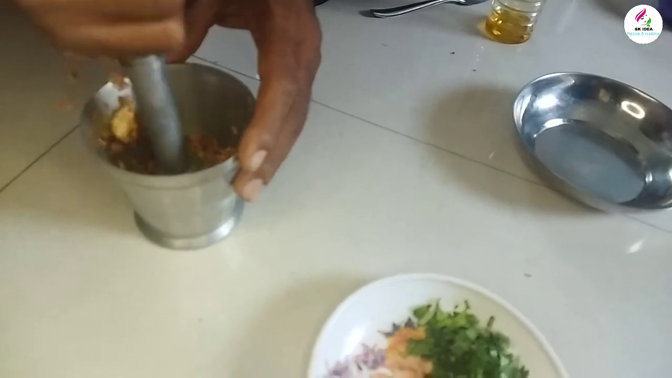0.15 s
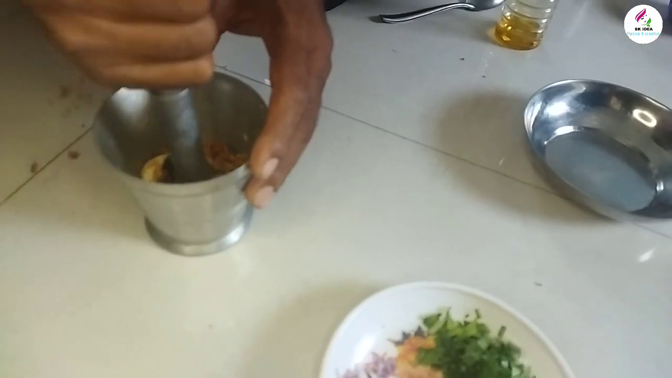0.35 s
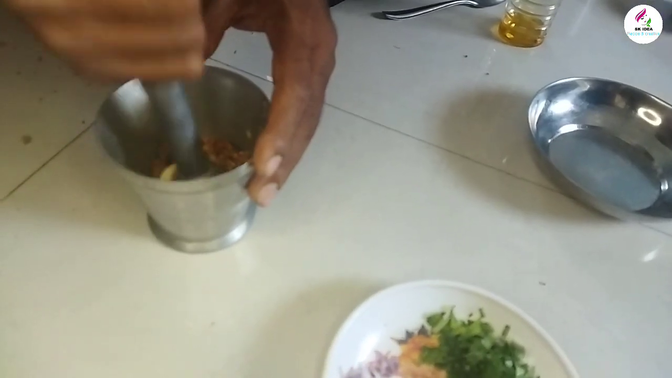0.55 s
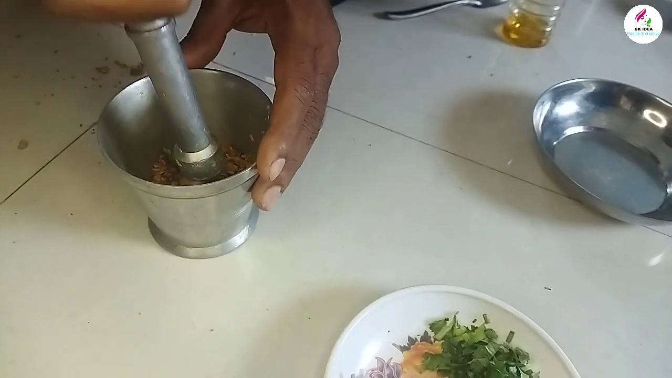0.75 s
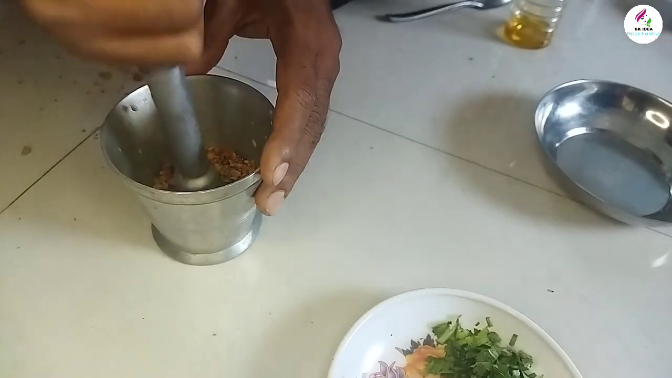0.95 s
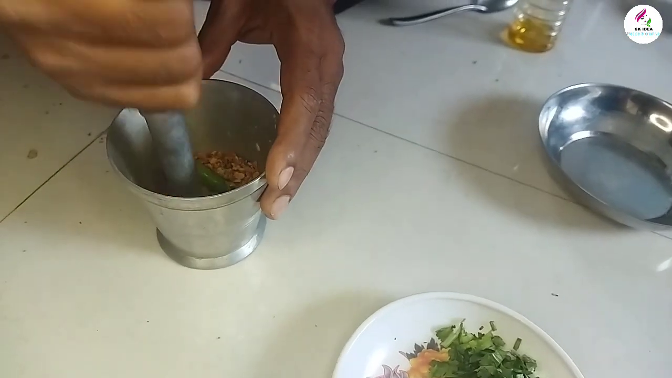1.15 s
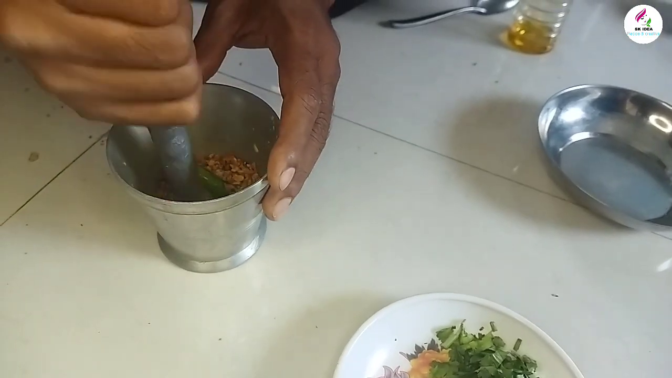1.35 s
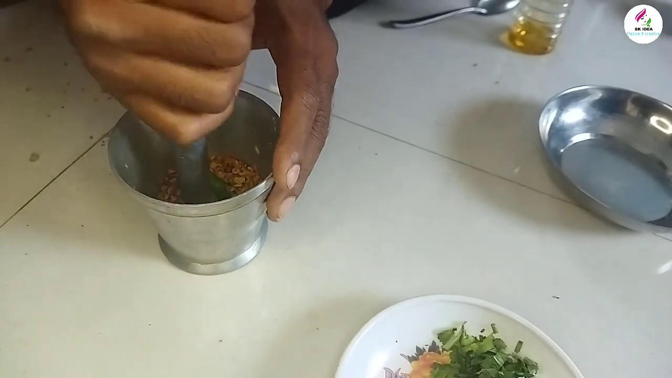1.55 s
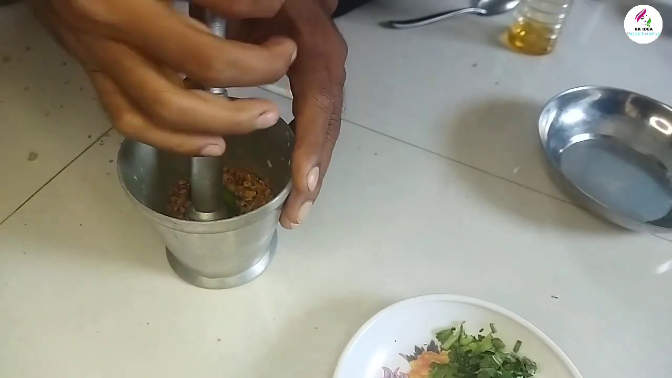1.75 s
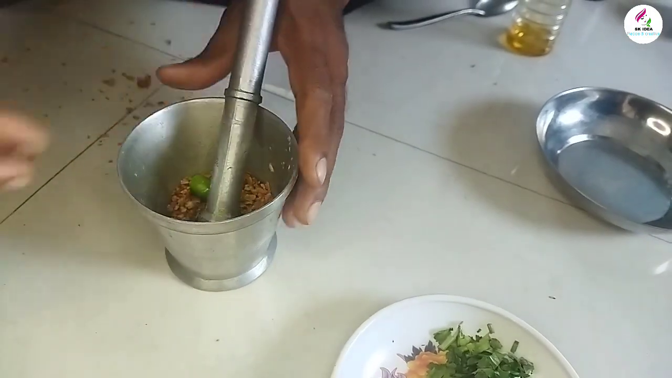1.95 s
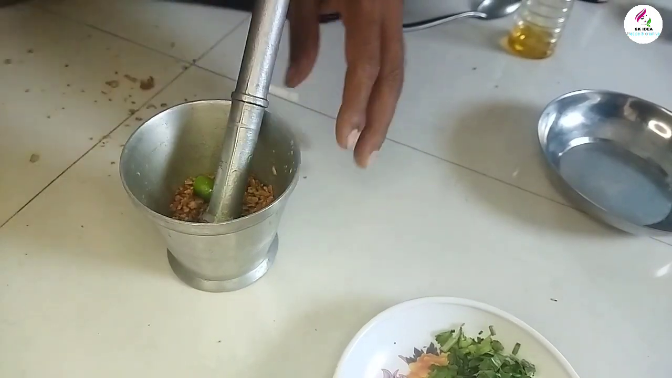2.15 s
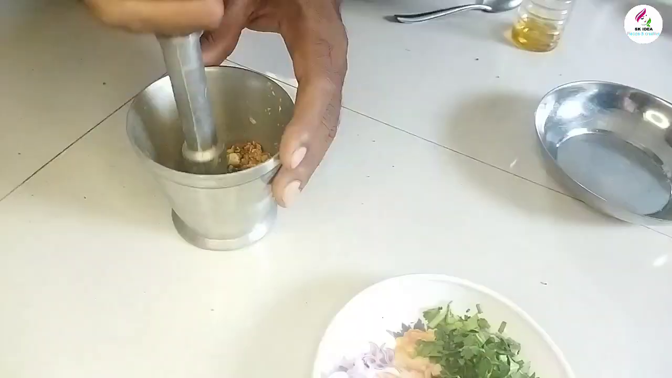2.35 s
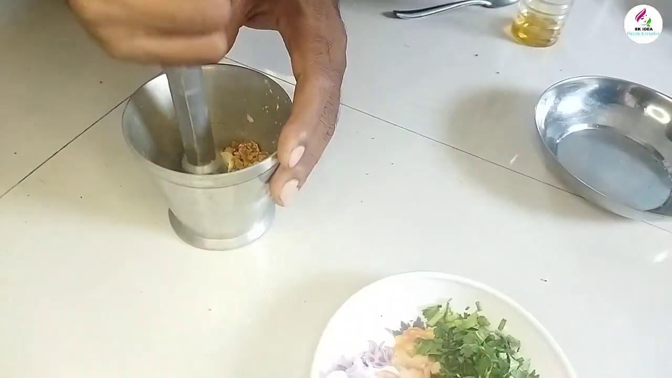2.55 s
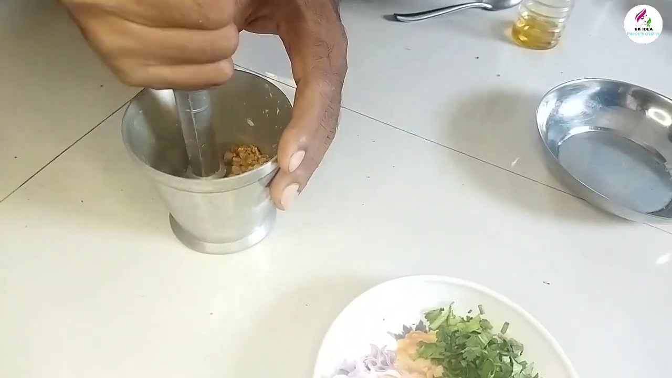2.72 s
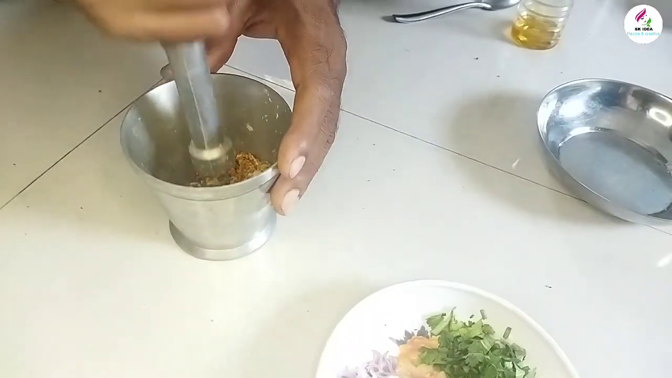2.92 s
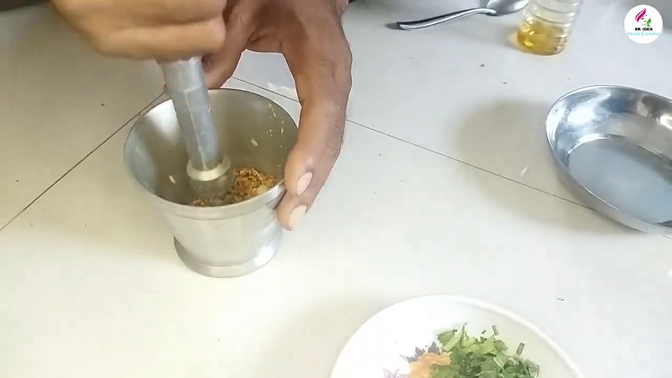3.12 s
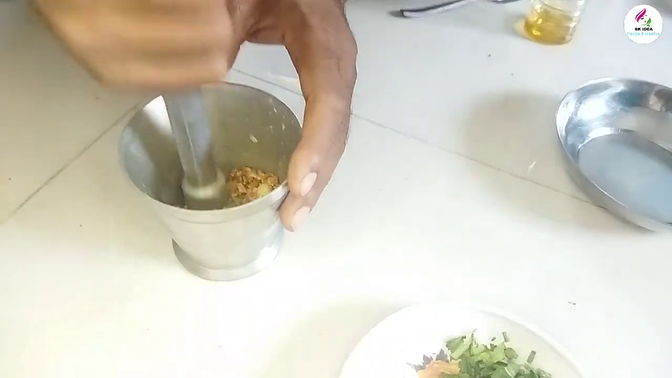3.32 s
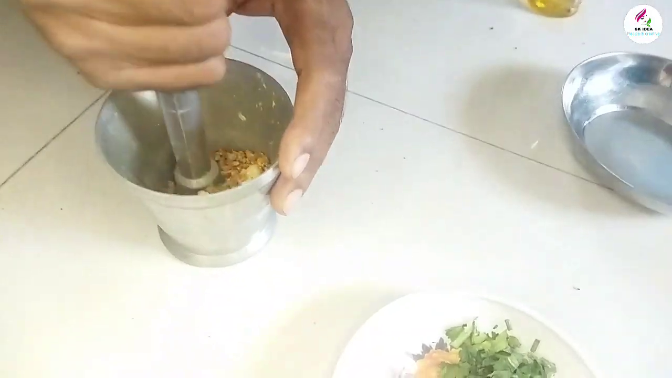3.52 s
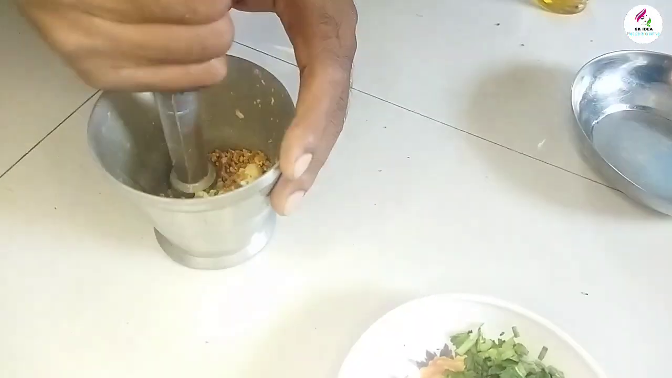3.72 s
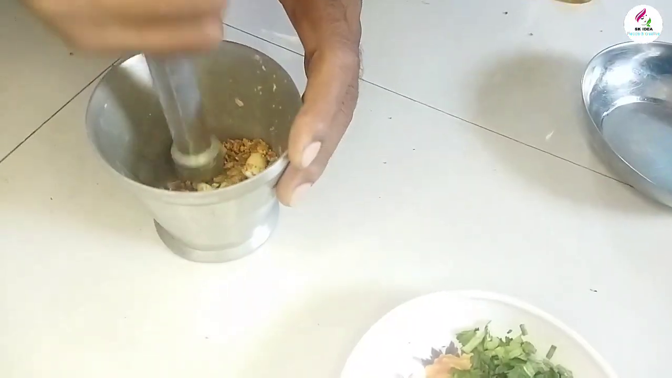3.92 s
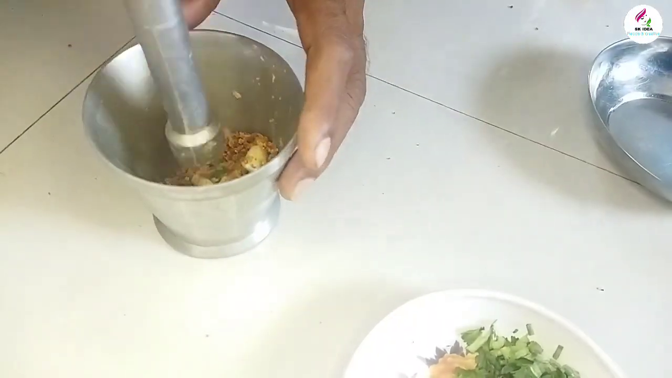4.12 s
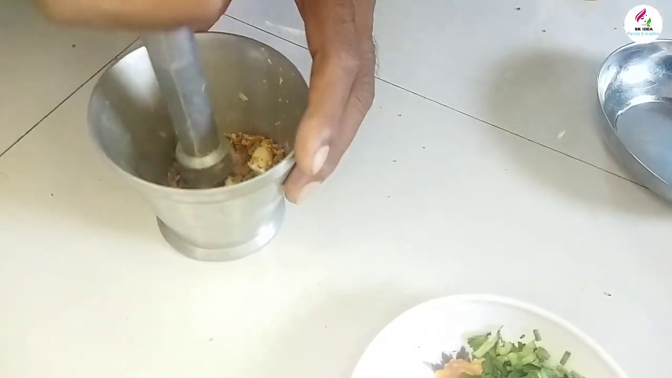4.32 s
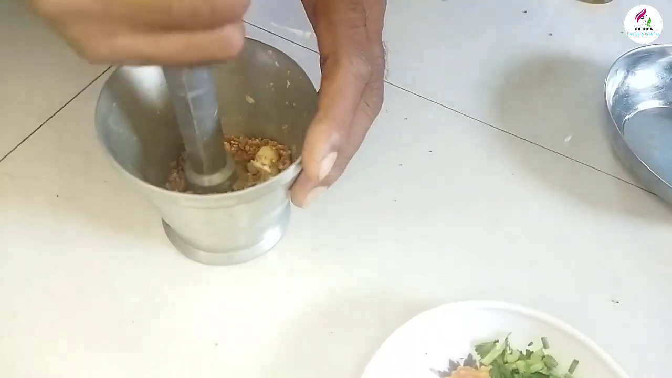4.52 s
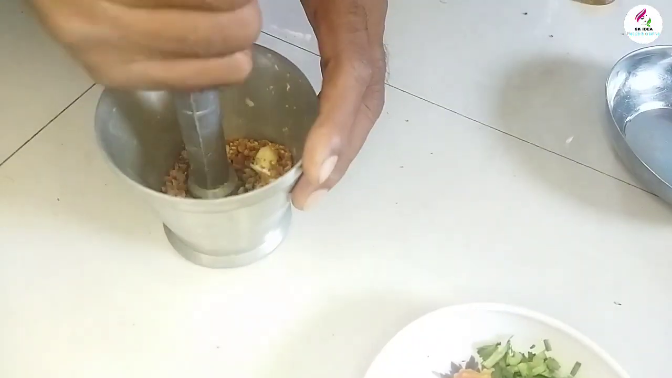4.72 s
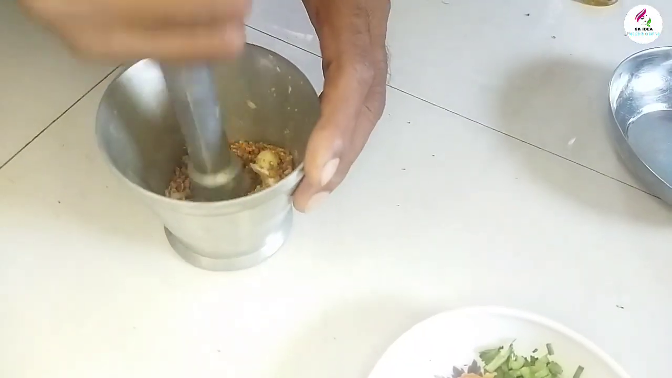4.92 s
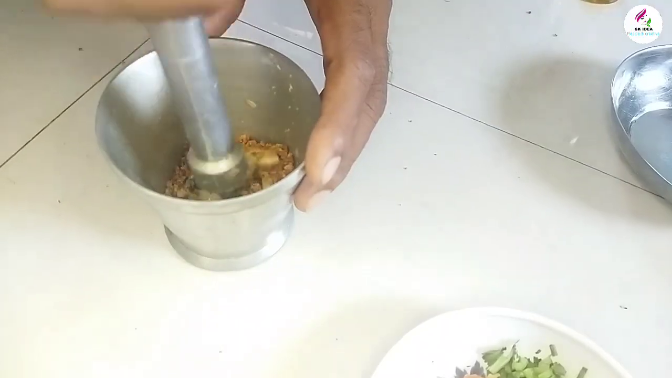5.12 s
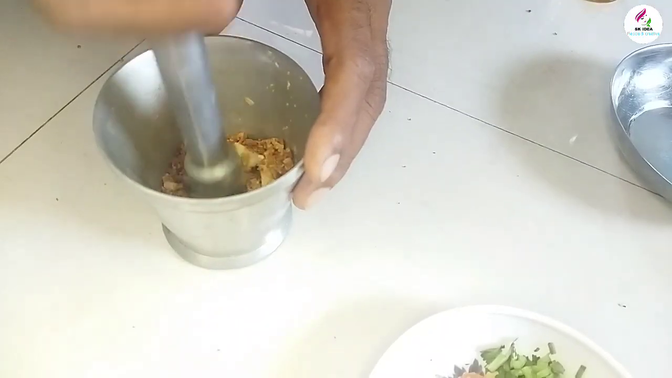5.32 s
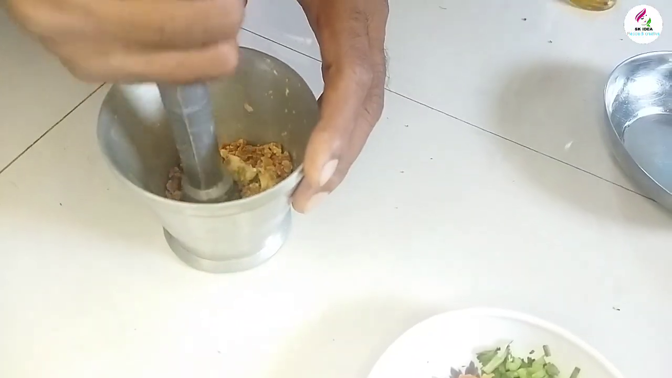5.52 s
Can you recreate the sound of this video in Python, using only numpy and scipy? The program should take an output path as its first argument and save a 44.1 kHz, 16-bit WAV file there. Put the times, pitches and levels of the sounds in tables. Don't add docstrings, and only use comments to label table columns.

```python
import sys
import numpy as np
from scipy import signal
from scipy.fft import rfft, irfft, next_fast_len
from scipy.io import wavfile
from scipy.ndimage import uniform_filter1d, map_coordinates

SR = 44100
rng = np.random.default_rng(int(sys.argv[2]) if len(sys.argv) > 2 else 0)


def invert_db(x):
    u = np.asarray(x, float) / 20
    return 10 ** u


def wrap_up_sound(samples):
    columns = np.atleast_2d(samples).T
    tamed = np.clip(columns, -1, 1)
    steps = np.round(tamed * 32767).astype(np.int16)
    wavfile.write(sys.argv[1], SR, steps)


N = 245637


def unit(x):
    return x / np.sqrt(np.mean(x ** 2) + 1e-20)


def along(points, hz):
    f, v = np.transpose(points)
    return np.interp(np.log(hz + 1), np.log(f + 1), v)


def curves(rows):
    s, *cols = np.transpose(rows)
    return [np.interp(np.arange(N) / SR, s, c) for c in cols]


def wobble(rate):
    knots = rng.standard_normal(int(N * rate / SR) + 4)
    return map_coordinates(knots, [np.arange(N) * rate / SR])


def filtered(x, response):
    m = next_fast_len(x.shape[-1] + 8192)
    spectrum = rfft(x, m) * response(np.fft.rfftfreq(m, 1 / SR))
    return irfft(spectrum, m)[..., :x.shape[-1]]


def coloured(x, spectrum):
    return filtered(x, lambda hz: invert_db(along(spectrum, hz)))


def causal(spectrum, size=4096):
    level = invert_db(along(spectrum, np.fft.rfftfreq(size, 1 / SR)))
    cepstrum = irfft(np.log(level + 1e-6), size)
    fold = np.r_[1, np.full(size // 2 - 1, 2), 1, np.zeros(size // 2 - 1)]
    pulse = irfft(np.exp(rfft(cepstrum * fold)), size)
    return pulse / np.abs(pulse).max()


def add(track, s, sound):
    part = track[..., round(s * SR):][..., :sound.shape[-1]]
    part += sound[..., :part.shape[-1]]


def sides(db):
    return invert_db([[db / 2], [-db / 2]])


# hz, likeness [-1..1]
SIDE_LIKENESS = [(60, 0.68), (240, 0.56), (950, 0.24), (3770, -0.38), (15000, -0.33)]


def rush(spectrum):
    def mid_side_gains(hz):
        mix = np.arccos(np.clip(along(SIDE_LIKENESS, hz), -1, 1)) / 2
        return invert_db(along(spectrum, hz)) * [np.cos(mix), np.sin(mix)]

    mid, side = filtered(rng.standard_normal((2, N)), mid_side_gains)
    return unit(np.array([mid + side, mid - side]))


# start_s, level_db
ENGINE_LEVEL = [(0.0, -56.5), (0.2, -62), (0.57, -58), (0.8, -57), (1.14, -61), (1.39, -56), (2.01, -54),
                (2.23, -62), (2.4, -79)]
# start_s, firing_hz
IDLE_SPEED = [(0, 38.22), (1.4, 37.24), (2.1, 37.22), (2.4, 36.5)]
# multiple of the firing rate, level_db
FIRING_ORDERS = [(1, -67), (2, -19.5), (3, -21), (4, -37), (5, -9.5), (6, -2.5), (7, -16.5), (8, -20),
                 (9, -22.5)]
# hz, level_db (per Hz)
STREET_COLOUR = [(20, -60), (40, -33), (70, -12), (140, -3.5), (165, -8), (180, 5.5), (197, -9),
                 (230, -6.5), (400, -9), (700, -14), (1100, -19)]
# hz, level_db (per Hz)
AIR_COLOUR = [(180, -11), (300, 0), (386, -13), (1430, 4), (3080, 3.5), (7130, -10), (9480, -16),
              (11200, -27), (12200, -7.5), (15400, -15.5), (16500, -46.5)]


def outside(near):
    engine_db, = curves(ENGINE_LEVEL + [(ENGINE_LEVEL[-1][0] + 0.086, -110)])
    firing_hz = curves(IDLE_SPEED)[0] * (1 + 0.0021 * wobble(5.8))
    turn = 2 * np.pi * np.cumsum(firing_hz) / SR
    engine = 0
    for multiple, db in FIRING_ORDERS:
        engine = engine + invert_db(db + 0.85 * wobble(7.69)) * np.sin(multiple * turn + 1.05 * wobble(12))

    far_traffic_db, tyres_db = -64.5, -5.5
    street_level = np.hypot(invert_db(far_traffic_db), invert_db(engine_db + tyres_db))
    street = street_level * invert_db(2.8 * wobble(24)) * rush(STREET_COLOUR)

    still_db, late_db, late_s = -61.5, -25, 0.05
    keep = np.exp(-1 / (late_s * SR))
    late = near ** 2
    for _ in range(2):
        late = signal.lfilter([1 - keep], [1, -keep], late)
    air_level = np.sqrt(invert_db(2 * still_db) + invert_db(2 * (engine_db - 4)) + invert_db(2 * late_db) * late)
    air = air_level * invert_db(1.5 * wobble(21)) * rush(AIR_COLOUR)
    return invert_db(engine_db + 2.0) * unit(engine) + street + air


# hz, t60_s
TILE_DECAY = [(150, 0.49), (600, 0.41), (1400, 0.48), (4000, 0.26), (10000, 0.38), (16000, 0.19)]


def kitchen(x):
    out, step = np.zeros((2, N)), SR // 4
    uneven_db = 3.0
    for a in range(0, N, step):
        hz, t, z = signal.stft(rng.standard_normal((2, SR // 2)), SR, nperseg=256)
        patches = unit(uniform_filter1d(rng.standard_normal(z.shape[1:]), size=24, axis=1))
        decay_db = 60 * t / along(TILE_DECAY, hz)[:, None]
        tail = signal.istft(z * invert_db(uneven_db * patches - decay_db), SR, nperseg=256)[1]
        tail = tail / np.linalg.norm(tail[0])
        add(out, a / SR + .009, signal.fftconvolve(x[None, a:a + step], tail, axes=1))
    return out


# start_s, pressure_db
PALM_SLIDE = [
    (1.672, -90),
    (1.68, -51.5),
    (1.85, -42),
    (1.936, -41),
    (1.98, -53.5),
    (2.036, -51),
    (2.1, -69),
    (2.278, -51),
    (2.414, -77),
]
# hz, level_db (per Hz)
SKIN_COLOUR = [(880, -50), (1500, -27), (1660, -2), (3210, -9.5), (4520, -9.5), (4950, -14.5),
               (5360, -14.5), (6420, -11.5), (7030, -17), (9400, -0.5), (12200, -4), (15700, -16.5),
               (16500, -62.5)]


def palm():
    start_s, end_s = PALM_SLIDE[0][0], PALM_SLIDE[-1][0]
    level_db, = curves([(start_s - .01, -110)] + PALM_SLIDE + [(end_s + .04, -110)])
    grain = invert_db(1.5 * wobble(300) + 1.1 * wobble(40))
    return invert_db(level_db + 2.5) * unit(coloured(grain * rng.standard_normal((2, N)), SKIN_COLOUR))


# start_s, push_db, knock_db
COUNTER_THUMPS = [(0.859, -78, -34), (1.382, -75, -32), (2.489, -53, -50), (2.999, -54, -69),
                  (3.245, -42, -63), (3.492, -34.5, -52), (3.728, -33.5, -39), (3.972, -52, -56),
                  (4.497, -62, -37.5), (4.742, -95, -50), (5.217, -50, -64), (5.458, -52, -62)]


def counter():
    out, t = np.zeros(N), np.arange(SR // 20) / SR
    knock_hz, knock_t60_s = 308, 0.032
    push = (1 - t / 0.00095) * t / 0.001 * np.exp(1 - t / 0.0013)
    for s, push_db, knock_db in COUNTER_THUMPS:
        knock = invert_db(knock_db - 60 * t / knock_t60_s) * np.sin(2 * np.pi * knock_hz * t)
        add(out, s - .002, invert_db(push_db - 10.0) * push + knock)
    return out


# pitch_hz, level_db, t60_s
AIR_MODES = [(1072, 2.5, 0.045), (1166, 3.5, 0.028), (1136, -17, 0.2)]
# start_s, peak_db
AIR_POPS = [(0.18, -36), (0.2757, -28.5), (0.39, -34), (0.4404, -36), (0.6763, -28), (0.7923, -26.5),
            (0.9486, -29.5), (1.1883, -32.5), (1.3, -33), (2.447, -37.5), (2.6956, -42.5), (2.9456, -35.5),
            (3.0693, -34.5), (3.1833, -42.5), (3.2444, -26.5), (3.2827, -34), (3.494, -16.5), (3.5543, -34),
            (3.708, -38), (3.735, -22.5), (3.7967, -32), (3.954, -36), (3.975, -29), (4.035, -28.5),
            (4.093, -32), (4.3165, -40.5), (4.5513, -39), (4.8088, -39.5), (5.1752, -51), (5.535, -35.5)]
# start_s, peak_db
PESTLE_SETTLES = [
    (1.8616, -14.5),
    (1.8765, -19.5),
    (1.8924, -29),
    (1.9038, -23.5),
    (1.935, -30.5),
    (2.0266, -36.5),
]


def cup():
    out, t = np.zeros(N), np.arange(SR // 6) / SR
    kick_early_s = 0.00251
    kicks = [(row[0] - kick_early_s, row[-1]) for row in FOOD_BLOWS]
    for s, db in kicks + AIR_POPS + PESTLE_SETTLES:
        bend = 1 + rng.normal(0, 0.0046)
        air = np.zeros(len(t))
        for k, (hz, level_db, t60_s) in enumerate(AIR_MODES):
            air += (-1) ** k * invert_db(level_db - 60 * t / t60_s) * np.sin(2 * np.pi * hz * bend * t)
        puff_db = -52.5 + 0.37 * (db + 42.5)
        puff_turn = 2 * np.pi * bend ** 3 * t
        puff = np.sin(740 * puff_turn) + 0.86 * np.sin(1420 * puff_turn)
        add(out, s - .002, invert_db(db - 6.0) * air + invert_db(puff_db - 60 * t / 0.031) * puff)
    return out


# start_s, spread_s, crunch_db, body_db, kick_db (to the cup air)
FOOD_BLOWS = [(0.0817, 0.0072, -30, -26.5, -24.5), (0.3434, 0.004, -33, -26, -27),
              (0.612, 0.0034, -29.5, -12, -31), (0.8628, 0.0024, -27.5, -19, -23),
              (1.1215, 0.0025, -28.5, -18, -22), (1.3837, 0.0024, -30.5, -19, -29.5),
              (2.497, 0.005, -31, -26.5, -50), (2.7516, 0.0054, -33, -37, -29.5),
              (3.0082, 0.0046, -33, -23, -24.5), (4.247, 0.0054, -30, -29, -73),
              (4.4986, 0.0069, -32, -15, -29.5), (4.7482, 0.0047, -31, -19.5, -34.5),
              (4.9839, 0.0036, -32.5, -30, -71), (5.22, 0.0051, -33, -29, -32),
              (5.4611, 0.0036, -33, -35, -27)]
# hz, level_db (per Hz)
FOOD_COLOUR = [(18, -78.5), (30, -60), (306, -3.5), (547, -20), (953, -12), (1090, -9), (1310, -11.5),
               (2340, -6.5), (3210, -4.5), (5300, -9.5), (7470, -19), (9220, -11.5), (14800, -17),
               (16500, -43)]
# start_s, peak_db, pitch_hz
RINGING_SNAPS = [(0.0687, -24, 2590), (0.313, -33, 2760), (0.412, -28, 10620), (0.4554, -33, 11020),
                 (1.118, -19, 2270), (1.8677, -30.5, 2840), (1.893, -31, 10500), (1.935, -39, 9510),
                 (2.283, -30.5, 2760), (2.4838, -23, 3080), (2.9947, -20, 2845), (3.2808, -13.5, 2680),
                 (3.5292, -13, 2710), (4.2308, -30, 3100), (4.482, -25, 2390), (4.8883, -53, 3140),
                 (5.206, -39, 2190), (5.3214, -58, 3240), (5.416, -49, 3080)]
# start_s, peak_db, left_right_db
HUSK_TICK = [
    (2.61, -16, -3),
]
# hz, level_db (per Hz)
HUSK_COLOUR = [(470, -34), (1800, -26), (3200, -7), (5200, -12), (7910, -14), (8530, -12), (9930, 3),
               (11100, -25.5), (12200, 7.5), (16500, -47)]


def crunches():
    out, t = np.zeros((2, N)), np.arange(-2048, 2048) / SR
    for s, spread, db, body_db, _ in FOOD_BLOWS:
        sink = np.exp(t / (2.1 * spread) - (t / (3.5 * spread)) ** 6)
        landing = np.exp(-.5 * (t / (1.056 * spread)) ** 2)
        swarm = np.where(t < 0, sink, landing)
        clumps = uniform_filter1d(rng.standard_normal(len(t)), size=25) * 5
        bursts = rng.standard_normal(len(t)) * invert_db(2.8 * clumps)
        tone = [(350, -8.5), (800, body_db + 28.0), (1800, 2), (6000, 1), (8000, 3)]  # Hz, dB
        crunch = unit(filtered(bursts, lambda hz: invert_db(along(FOOD_COLOUR, hz) + along(tone, hz))))
        pan_db = -4 + 1.04 * s
        add(out, s + t[0], invert_db(db + 5.5) * sides(pan_db) * swarm * crunch)
    return out


def snaps():
    out, t = np.zeros((2, N)), np.arange(3000) / SR
    for s, db, pitch_hz in RINGING_SNAPS:
        noise = rng.standard_normal(len(t))
        grit = filtered(noise, lambda hz: np.exp(-(np.log(hz / pitch_hz + 1e-3) / 0.3) ** 2))
        shape = invert_db(db - 60 * t / .02) * (1 - np.exp(-t / 0.00082))
        pan_db = -0.2 * (db + 45)
        add(out, s, shape * sides(pan_db) * (np.sin(2 * np.pi * pitch_hz * t) + .5 * unit(grit)))
    for s, db, pan_db in HUSK_TICK:
        husk = unit(coloured(rng.standard_normal(len(t)), HUSK_COLOUR))
        add(out, s, invert_db(db - 2.5 - 60 * t / 0.015) * sides(pan_db) * husk)
    return out


# start_s, crack_db, rim_db, wall_db, shaft_db
STEEL_BLOWS = [
    (0.338, -35, -50, -60, -39),
    (1.1196, -74, -28, -35, -53),
    (2.29, -20, -31.5, -32.5, -83),
    (3.2435, 1.5, -16, -17.5, -18),
    (3.492, 2, -15.5, -19.5, -15),
    (3.7311, 3, -14, -14, -12),
    (3.975, 1.5, -8, -15, -6),
]
# pitch_hz, level_db, t60_s
STEEL_MODES = [(1792, -13.5, 0.27), (2150, -24, 0.3), (2574, -20, 0.34), (2692, -20, 0.5),
               (2767, -20, 0.45), (2900, -24, 0.35), (3070, -26, .3), (3413, -26, 0.12),
               (4137, -10.5, 0.32), (4420, -25, 0.25), (5140, -44.5, .3), (6002, -43, 0.33),
               (7290, -44, 0.21), (8900, -38, .24), (10029, -20, 0.24), (10886, -27, 0.15),
               (12674, -19.5, 0.15), (14950, -25, .17)]
# hz, level_db (per Hz)
WALL_COLOUR = [(2000, -8), (2500, 18), (2800, 24), (3350, 14), (3700, 2.5), (4700, 12.5), (5200, -8.5),
               (7300, 1), (9500, -58), (11000, -34)]
# hz, level_db (per Hz)
CRACK_COLOUR = [(150, -47), (250, -20.5), (644, -22), (1250, -9.5), (2080, -14), (3400, -3.5), (6510, -21),
                (9080, -21.5), (11000, -20), (13600, -33.5), (15100, -24), (16500, -46)]


def steel():
    out, t = np.zeros((2, N)), np.arange(SR // 3) / SR

    def drift(rate):
        both = rng.standard_normal((2, int(rate / 3) + 4))
        return np.array([map_coordinates(knots, [t * rate]) for knots in both])

    stop = 1 / (1 + np.exp((t - .245) / .006))
    for s, crack_db, rim_db, wall_db, shaft_db in STEEL_BLOWS:
        chatter = 0.21 * invert_db(-60 * t / 0.019) * rng.standard_normal(len(t))
        chatter[0] += np.interp(wall_db, [-26, -18], [.2, 1.5])
        crack = signal.fftconvolve(chatter, causal(CRACK_COLOUR))[:len(t)]

        free = np.interp(wall_db, [-32, -18], [.7, 1])
        high_db = (rim_db + shaft_db) / 2 - 0.5
        reach = [(1800, rim_db), (2700, wall_db), (4140, shaft_db), (9000, high_db)]
        ring = np.zeros((2, len(t)))
        for hz, db, t60_s in STEEL_MODES:
            waver_db = rng.normal(0, 1.5) + 2.6 * drift(45)
            level = invert_db(db + along(reach, hz) + waver_db - 60 * t / (t60_s * free))
            cycles = hz * t + rng.random() + 0.34 * rng.random((2, 1))
            ring += level * np.sin(2 * np.pi * cycles + hz / 14000 * drift(70))

        wall = unit(coloured(rng.standard_normal((2, len(t))), WALL_COLOUR))
        wall = invert_db(wall_db - 12.5 - 60 * t / (0.5 * free)) * wall
        onset = 1 - np.exp(-t / 0.00057)
        add(out, s, invert_db(crack_db - 6.0) * crack + (ring + wall) * stop * onset)

        lead = np.arange(-600, 0) / SR
        crumbs = unit(coloured(rng.standard_normal(len(lead)), FOOD_COLOUR))
        add(out, s + lead[0], invert_db(crack_db - 24.5 + 60 * lead / 0.018) * crumbs)
    return out


# hz, left_right_db
PORT_TILT = [(300, 0), (2400, 2.5), (4400, 2.5), (8100, 2.5), (15000, 13)]


def ports(x, lead):
    def half(hz):
        return invert_db(along(PORT_TILT, hz) / 2) * np.exp(.5j * along(lead, hz))

    return filtered(x, lambda hz: np.array([half(hz), 1 / half(hz)]))


# hz, left_lead_radians
FOOD_LEAD = [(150, 0.63), (1460, 0.65), (2240, 0.59), (4700, 1.14), (15000, 1.7)]
STEEL_LEAD = [(1100, 0), (1800, 1.8), (2700, 2.3), (3300, .6), (4130, .5), (4700, 2.5), (10000, 2.8),
              (15000, 2.5)]
COUNTER_LEAD = [(30, 4.1), (120, 0.33), (400, 0.99)]


def scene():
    soft, hard = crunches() + snaps() + cup() + palm(), steel()
    airborne = filtered(soft.mean(0) + invert_db(4.5) * hard.mean(0), lambda hz: 1 / (1 + (260 / (hz + 1)) ** 4))
    near = ports(soft, FOOD_LEAD) + ports(hard, STEEL_LEAD) + ports(counter(), COUNTER_LEAD)
    return near + invert_db(-9.0) * kitchen(airborne) + outside(airborne)


def thin_treble(x):
    near_db = [(1800, -30), (3400, -1.5), (5500, 1), (7200, 1), (8500, -.5), (10500, 1), (15000, 1)]  # Hz, dB
    loud_db = [(9800, -45), (10600, -21), (15000, -21)]  # Hz, dB
    hz, t, z = signal.stft(x, SR, nperseg=2048)
    power = np.mean(abs(z) ** 2, axis=0)
    whole = power.mean(0)
    around = uniform_filter1d(power ** .3, size=81, axis=0) ** (1 / .3)
    mask = around * invert_db(2 * along(near_db, hz))[:, None] + whole * invert_db(2 * along(loud_db, hz))[:, None]
    near = uniform_filter1d(uniform_filter1d(power, size=7, axis=0), size=2, axis=1)
    attack = whole > 2.5 * np.roll(whole, 1)
    return signal.istft(z * ((near > mask) | attack), SR, nperseg=2048)[1][:, :N]


def top_cut(x):
    return signal.sosfilt(signal.butter(12, 16630, fs=SR, output="sos"), x)


def record(dry):
    keep = np.exp(-1 / (.03 * SR))
    power = signal.lfilter([1 - keep], [1, -keep], np.mean(dry ** 2, axis=0))
    ducked = dry * (1 + power / invert_db(-33)) ** -.12
    rounded = ducked / (1 + abs(ducked / .9) ** 4) ** .25
    mix = thin_treble(filtered(rounded, lambda hz: hz < 16600))
    return top_cut(mix)


dry = scene()
out = record(dry)
wrap_up_sound(out)
```